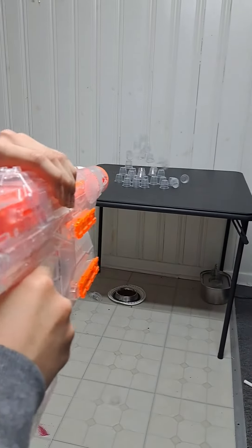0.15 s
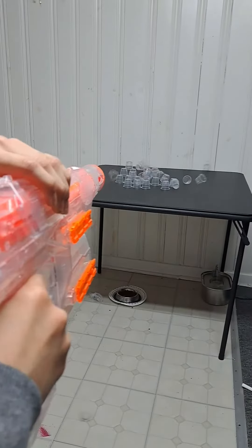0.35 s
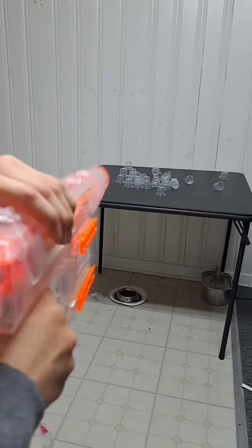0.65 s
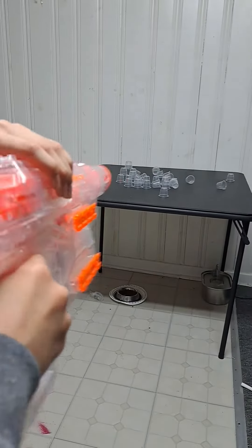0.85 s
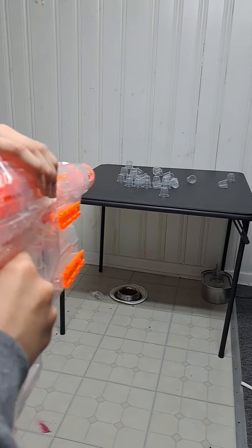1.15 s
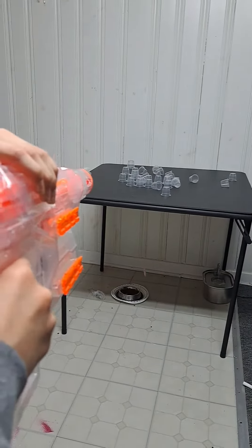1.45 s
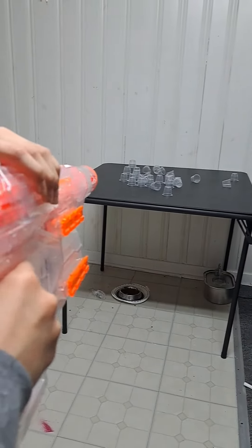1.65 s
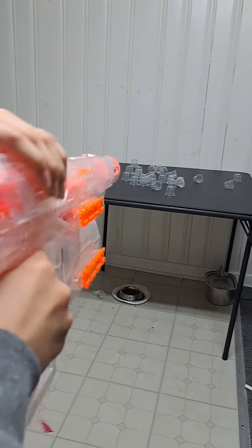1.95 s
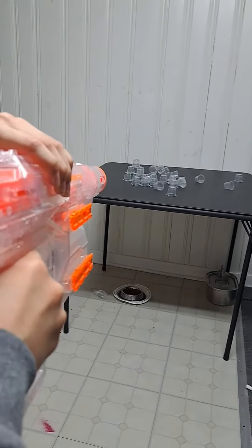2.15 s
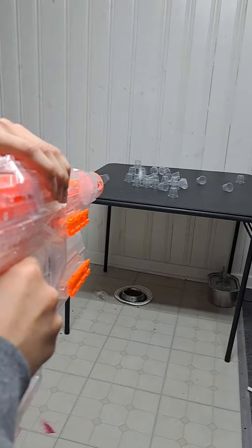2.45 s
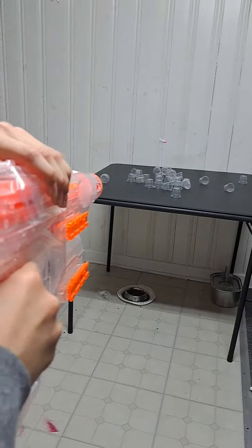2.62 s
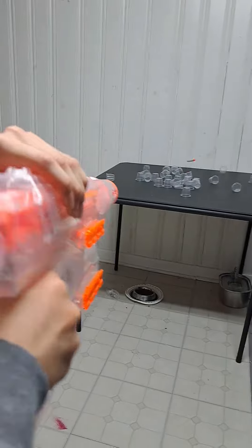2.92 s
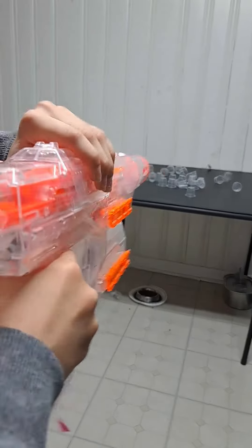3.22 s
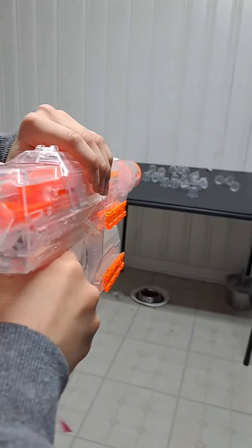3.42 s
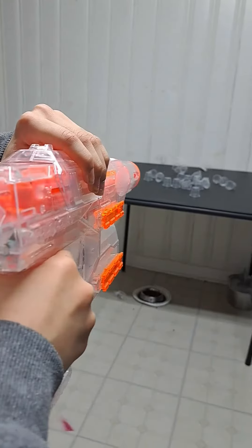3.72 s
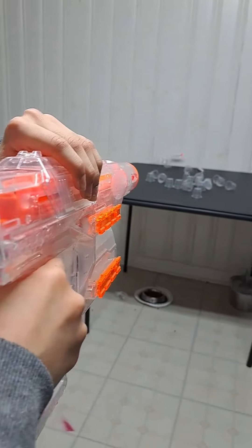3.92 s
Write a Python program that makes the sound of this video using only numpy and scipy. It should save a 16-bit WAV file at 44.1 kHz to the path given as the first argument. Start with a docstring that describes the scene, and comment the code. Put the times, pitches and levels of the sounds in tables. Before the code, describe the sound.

Close plastic cracks and ratcheting slide clacks from a spring dart blaster, with small cups popping and clattering farther off in a small room.

```python
"""A trigger creaks and a spring dart blaster cracks, close to the microphone in a small bare room.
It fires four times; between shots the slide ratchets back and clacks shut. Farther off, foam darts
slap a stack of small plastic cups and the wall behind. The cups pop hollowly on a folding table,
click on the floor and rock on their rims. The room answers every blow, heard in stereo."""
import sys
import numpy as np
from scipy import signal
from scipy.fft import rfft, irfft, next_fast_len
from scipy.io import wavfile
from scipy.ndimage import uniform_filter1d

SR = 44100
rng = np.random.default_rng(int(sys.argv[2]) if len(sys.argv) > 2 else 0)


def transcribe(u):
    """Save the signal u as a 16-bit wav file named by the first command-line argument.

    u: samples, shape (n,) or (channels, n), limited to [-1, 1]; the rate is SR.
    q: integer samples, one column per channel.
    """
    v = np.clip(np.atleast_2d(u).T, -1, 1)
    q = np.round(v * 32767).astype(np.int16)
    wavfile.write(sys.argv[1], SR, q)


N = 179751
T = np.arange(SR // 5) / SR  # seconds within one blow

# The blaster fires. Each row: catch release in seconds, trigger lead in seconds, crack in dB,
# thud in dB, t60 of the spring's shudder in seconds.
SHOTS = [(0.0914, 0.052, -0.5, -3, 0.25), (1.2891, 0.054, 0.5, -1, 0.26), (2.451, 0.06, 1, 0, 0.2),
         (3.634, 0.067, 0.5, 0.5, 0.29)]
# Within a shot the trigger bottoms out, the catch lets go, the plunger lands and rebounds.
# Each row: delay in seconds, crack in dB, thud in dB, thud centre in Hz, crack t60 in seconds.
FIRING_CONTACTS = [(-0.0068, -24.5, -20.5, 176, 0.029), (0, -13, -21, 500, 0.043),
                   (0.0273, -14.5, -11.5, 530, 0.029), (0.0563, -30, -29, 540, 0.027)]
# Modes of the blaster's shell, the air in its barrel, and the table or wall panel.
# Each row: pitch in Hz, relative level in dB, t60 in seconds.
SHELL_MODES = [(134, -19.5, 0.032), (185, -13.5, 0.042), (387.7, -3.5, 0.061), (443.5, 0, 0.054),
               (502.5, 3.5, 0.038), (573.8, -6, 0.071), (604.8, 1.5, 0.041), (710, -4, 0.065),
               (1093, -26, 0.016), (1480, -18, 0.023), (1937, -6, 0.02), (2560, -2, 0.014)]
BARREL_MODES = [(461, -2, 0.23), (509.5, -2, 0.22)]
PANEL_MODES = [(147, -22, 0.026), (198.7, -11, 0.12), (309, -2, 0.069), (327.4, -10, 0.069),
               (369, 1, 0.065), (409, -7, 0.084), (556, 8.5, 0.025), (719, 1, 0.041)]
# A dart strikes cups, table or wall. Each row: start in seconds, slap in dB, panel boom in dB.
DART_HITS = [(0.1931, -18, -38), (0.4547, -48, -29.5), (1.4273, -18.5, -18.5), (1.4906, -30.5, -37),
             (2.5351, -15, -28.5), (2.5625, -23, -57), (3.7401, -19, -29), (3.7654, -29.5, -46.5)]
# A cup lands mouth down. Each row: start in seconds, level in dB, cavity pitch in Hz, table thump in dB.
CUP_LANDINGS = [(0.245, -11.5, 1523, -59), (0.391, -26, 1574, -29.5), (0.74, -23.5, 1508, -61),
                (0.774, -33, 1520, -47), (0.8519, -25.5, 1353, -52), (1.194, -42, 1420, -64),
                (2.626, -11, 1531, -28.5), (2.89, -29.5, 1523, -40), (3.149, -22.5, 1540, -49),
                (3.2646, -20.5, 1535, -46), (3.324, -20, 1472, -69), (3.486, -29, 1504, -59),
                (3.604, -23.5, 1550, -66), (3.872, -20.5, 1530, -30), (4.027, -32.5, 1610, -51)]
# Modes of a cup. Each row: multiple of the cavity pitch, relative level in dB, t60 in seconds.
CUP_MODES = [(0.82, -1, 0.017), (1, 6, 0.036), (1.119, 0, 0.018), (1.3, -12, 0.011)]
# Rims strike each other or the floor. Each row: start in seconds, click in dB, thump in dB.
RIM_HITS = [(0.282, -15.5, -36), (0.386, -22.5, -38.5), (0.473, -29.5, -62), (0.523, -32.5, -38),
            (0.765, -27.5, -66), (0.775, -24.5, -60), (1.041, -39.0, -44.5), (1.091, -33, -74),
            (1.611, -38.5, -44), (3.151, -27.5, -42), (3.841, -22.5, -33), (4.005, -27.5, -30.5)]
# Toppled cups nudge each other. Each row: start and end in seconds, highest tick level in dB.
SETTLING_SPANS = [(0.295, 1.095, -41.5), (1.518, 1.75, -46), (2.656, 4.05, -47.5)]
# The slide goes back. Each row: arrival at the stop in seconds, ratchet run in seconds, level in dB.
SLIDE_PULLS = [(0.6986, 0.075, 1), (1.8765, 0.0795, -0.5), (3.0393, 0.075, 0)]
# Where the ratchet catches. Each entry: share of the run still to go.
RATCHET_TEETH = [1, 0.655, 0.46, 0.325, 0.11]
# The slide is pushed shut. Each row: landing in seconds, level in dB.
SLIDE_SHUTS = [(0.8957, -0.5), (2.0791, 1), (3.2411, 0.5)]
# In closing, a dart is fed, the slide brushes the latch and lands, and the latch snaps in.
# Each row: delay in seconds, crack in dB, thud in dB, thud centre in Hz, crack t60 in seconds.
CLOSING_CONTACTS = [(-0.102, -32.5, -34.5, 427, 0.042), (-0.015, -31.5, -41, 547, 0.04),
                    (0, -13.5, -21.5, 620, 0.022), (0.0036, -14.5, -22, 705, 0.03)]
# A fallen cup rocks. Each row: start and end in seconds, first and last pitch in Hz,
# first and last level in dB.
ROCKING_SPANS = [(0.867, 1.235, 1465, 1452, -41.5, -47.5), (1.472, 1.662, 1313, 1077, -46, -46),
                 (1.902, 2.41, 1560, 1145, -47.5, -47)]
# Noise colours of the blaster's crack, a dart's slap, a cup's thin wall, its rim, and the room's air.
# Each row: frequency in Hz, relative spectral density in dB.
CRACK_SPECTRUM = [(30, -1), (110, -26.5), (400, 2), (950, 3.5), (1400, 6.5), (2000, 9.5), (3200, 0.5),
                  (5000, 2.5), (7400, -1), (9000, -6.5), (12000, -2.5), (16000, -11)]
SLAP_SPECTRUM = [(80, -44.5), (400, 3), (850, 3.5), (1500, 9), (2200, 0.5), (3200, -10.5), (7000, -9),
                 (16000, -11.5)]
CUP_WALL_SPECTRUM = [(150, -20), (800, -13), (1300, 0), (2050, -3.5), (3000, -25.5), (12000, -22),
                     (16000, -32)]
RIM_SPECTRUM = [(100, -21), (900, 0), (1600, 8), (2500, -1), (3600, 6), (4900, -3.5), (6400, 0),
                (8500, -7.5), (12000, -3.5), (16000, -10.5)]
AIR_SPECTRUM = [(30, -14), (70, -20), (700, -6.5), (2000, -19.5), (16000, -60)]
# How alike the microphone's two ports sound. Each row: frequency in Hz, left-right correlation.
PORT_LIKENESS = [(150, 0.84), (350, 1), (650, 0.43), (1500, -0.099), (3500, -0.29), (9000, 0.21)]
# How the ports differ in colour. Each row: frequency in Hz, left over right in dB.
PORT_BALANCE = [(150, .5), (350, -1.5), (700, -4.5), (1800, -3), (4000, -1), (8000, -2), (14000, 3)]


def amp(db):
    """Decibels to gain."""
    return 10 ** (np.asarray(db) / 20)


def along(points, hz):
    """Read a curve of (Hz, value) points on a log frequency axis."""
    freqs, values = np.transpose(points)
    return np.interp(np.log(hz + 1), np.log(freqs), values)


def filtered(x, response):
    """x through a response given as a function of frequency."""
    n = x.shape[-1]
    padded = next_fast_len(n + SR // 20)
    return irfft(rfft(x, padded) * response(np.fft.rfftfreq(padded, 1 / SR)), padded)[..., :n]


def coloured(x, spectrum, size=1024):
    """x through the causal filter that has this spectrum."""
    gain = amp(along(spectrum, np.fft.rfftfreq(size, 1 / SR)))
    cepstrum = irfft(np.log(gain))
    cepstrum[1:size // 2] *= 2  # fold to minimum phase
    cepstrum[size // 2 + 1:] = 0
    impulse = irfft(np.exp(rfft(cepstrum)))
    return signal.fftconvolve(x, impulse[None], axes=1)[:, :x.shape[1]]


def stereo_noise(n):
    """White noise at the microphone's two ports: alike in the bass, barely related in the treble."""
    def mid_side_gains(hz):
        angle = np.arccos(np.clip(along(PORT_LIKENESS, hz), -1, 1)) / 2
        return np.array([np.cos(angle), np.sin(angle)])
    mid, side = filtered(rng.standard_normal((2, n)), mid_side_gains)
    return np.array([mid + side, mid - side])


def unit_crest(x, size=180):
    """Scale a sound so that its loudest few milliseconds have rms 1."""
    power = np.mean(np.atleast_2d(x) ** 2, axis=0)
    return x / np.sqrt(uniform_filter1d(power, size, mode="constant").max() + 1e-20)


def burst(spectrum, t60, attack=0.00054):
    """The crack of a contact: coloured noise that dies quickly."""
    envelope = amp(-60 * T / max(t60, .002)) * (1 - np.exp(-T / attack))
    return unit_crest(coloured(stereo_noise(len(T)) * envelope, spectrum))


def ring(modes, attack, scatter_db, port_lag=.00006):
    """Damped modes at random strengths; each reaches one microphone port a little before the other."""
    hz, db, t60 = np.transpose(modes)[:, :, None]
    strength, phase, side = rng.uniform(-1, 1, (3, len(hz), 1))
    decay = amp(db + scatter_db * strength - 60 * T / t60) * (1 - np.exp(-T / attack))
    lag = port_lag * np.sign(side)
    ports = [(decay * np.sin(2 * np.pi * hz * (T + shift) + phase)).sum(0) for shift in (-lag, lag)]
    return unit_crest(np.array(ports))


def struck_at(modes, centre_hz, favour_db, reach=0.25):
    """Where a blow lands decides which modes answer: those near the centre pitch are favoured."""
    return [(hz, db + favour_db * np.exp(-(np.log(hz / centre_hz) / reach) ** 2), t60)
            for hz, db, t60 in modes]


def room(x, wet_db, low_t60=0.34, high_t60=0.25, split_hz=900, build_s=0.0056):
    """Direct sound plus the bare room's diffuse tail, new for each place, whose bass lasts longest."""
    t = np.arange(SR // 2) / SR
    noise = stereo_noise(len(t))
    low = signal.sosfilt(signal.butter(1, split_hz, fs=SR, output="sos"), noise)
    response = low * amp(-60 * t / low_t60) + (noise - low) * amp(-60 * t / high_t60)
    response *= 1 - np.exp(-(t / build_s) ** 2)
    response *= amp(wet_db) / np.linalg.norm(response[0])
    response[:, 0] += 1  # the straight path to the microphone
    return signal.fftconvolve(x, response, axes=1)


def add(out, s, x):
    """Mix x in at s seconds."""
    part = out[:, max(round(s * SR), 0):][:, :x.shape[1]]
    part += x[:, :part.shape[1]]


def rattle(swell_s, rattle_db, shell_db, fade_t60, rise_db, grain_db, grain_samples=45):
    """Tiny uneven knocks shake the blaster's shell, close up, and fade after swell_s."""
    late = T - swell_s
    swell = amp(np.where(late < 0, rise_db * late / swell_s, -60 * late / fade_t60))
    swell *= 1 - np.exp(-T / .006)  # eases in
    knocks = amp(np.minimum(rng.standard_normal(len(T) // grain_samples + 1), 1) * grain_db)
    drive = stereo_noise(len(T)) * swell * np.repeat(knocks, grain_samples)[:len(T)]
    shell = ring(SHELL_MODES, attack=0.002, scatter_db=5.0)
    body = unit_crest(signal.fftconvolve(drive, shell, axes=1)[:, :len(T)])
    grit = unit_crest(coloured(drive, CRACK_SPECTRUM))
    return room(amp(rattle_db) * grit + amp(shell_db) * body, wet_db=-11)


def contact(crack_db, thud_db, centre_hz, t60, attack, wet_db, favour_db=10, tilt_db=2, usual_t60=0.029):
    """Two parts of the blaster meet: a crack, and the hollow ring of the shell."""
    thud = amp(thud_db) * ring(struck_at(SHELL_MODES, centre_hz, favour_db), attack=0.0036, scatter_db=2)
    slope_db = tilt_db * np.log2(usual_t60 / t60)  # per octave: a shorter contact is brighter
    spectrum = [(hz, db + slope_db * max(np.log2(hz / centre_hz), 0)) for hz, db in CRACK_SPECTRUM]
    crack = amp(crack_db) * burst(spectrum, t60, attack)
    return room(crack, wet_db) + room(thud, wet_db=-13)


def blaster_shots(spring_lag_s=0.0045, spring_swell_s=0.022):
    """At the microphone the trigger creaks, the plunger flies, the spring shudders, the barrel hoots."""
    out = np.zeros((2, N))
    for s, lead_s, crack_db, thud_db, shudder_t60 in SHOTS:
        creak = rattle(0.0087, rattle_db=-43, shell_db=-47, fade_t60=0.13, rise_db=-5, grain_db=8.5)
        add(out, s - lead_s, creak)
        for delay, crack, thud, hz, t60 in FIRING_CONTACTS:
            knock = contact(crack + crack_db, thud + thud_db, hz, t60, attack=0.00066, wet_db=-5.5)
            add(out, s + delay, knock)
        shudder = rattle(spring_swell_s, rattle_db=crack_db - 17, shell_db=thud_db - 21.5,
                         fade_t60=shudder_t60, rise_db=8.5, grain_db=6)
        add(out, s + spring_lag_s, shudder)
        hoot = amp(thud_db - 21) * ring(BARREL_MODES, attack=0.0045, scatter_db=2.5)
        add(out, s + spring_lag_s + spring_swell_s, room(hoot, wet_db=-13.5))
    return out


def dart_hits():
    """Across the room a foam dart slaps and sets the low modes of the panel booming."""
    out = np.zeros((2, N))
    modes = struck_at(PANEL_MODES, centre_hz=271, favour_db=6, reach=0.54)
    for s, slap_db, panel_db in DART_HITS:
        slap = amp(slap_db) * burst(SLAP_SPECTRUM, t60=0.091, attack=0.00044)
        boom = amp(panel_db) * ring(modes, attack=0.0026, scatter_db=4.5)
        add(out, s, room(slap + boom, wet_db=-3))
    return out


def cup_note(hz):
    """The short hollow note of the air in a cup; its side modes shift with the way the cup lands."""
    modes = [(hz * ratio ** (1 + rng.normal(0, 0.41)), db, t60) for ratio, db, t60 in CUP_MODES]
    return ring(modes, attack=0.0009, scatter_db=7.5, port_lag=.00004)


def cup_pops(echo_s=0.0083, echo_db=-5, slap_db=-11, rim_db=-20, flop_s=0.00421, flop_db=-3):
    """Cups land on edge and flop flat on the table, which thumps; the wall behind repeats the note."""
    out = np.zeros((2, N))
    for s, db, hz, thump_db in CUP_LANDINGS:
        pop = cup_note(hz) + amp(slap_db) * burst(CUP_WALL_SPECTRUM, t60=0.12)
        pop += amp(rim_db) * burst(RIM_SPECTRUM, t60=0.025)
        add(pop, flop_s, amp(flop_db) * cup_note(hz))
        add(out, s, room(amp(db) * pop, wet_db=-1.5))
        add(out, s + echo_s, amp(db + echo_db) * pop[::-1])  # left and right swap in the echo
        thump = amp(thump_db) * ring(PANEL_MODES, attack=0.0033, scatter_db=7.5)
        add(out, s, room(thump, wet_db=1.5))
    return out


def rim_clicks():
    """Thin rims click far from the microphone, so the room is nearly as loud as the click."""
    out = np.zeros((2, N))
    for s, click_db, thump_db in RIM_HITS:
        click = amp(click_db) * burst(RIM_SPECTRUM, t60=0.024, attack=0.0014)
        thump = amp(thump_db) * ring(PANEL_MODES, attack=0.0013, scatter_db=5.5)
        add(out, s, room(click + thump, wet_db=-1))
    return out


def settling_cups(ticks_per_s=16, scatter_db=4):
    """Faint, distant rim ticks scatter while toppled cups come to rest."""
    out = np.zeros((2, N))
    for start, end, db in SETTLING_SPANS:
        for s in np.arange(start, end, 1 / ticks_per_s):
            delay, softness = rng.random(2)
            tick = burst(RIM_SPECTRUM, t60=0.032, attack=0.0015)
            add(out, s + delay / ticks_per_s, amp(db - scatter_db * softness) * tick)
    return room(out, wet_db=-0.5)[:, :N]


def slide_pulls(slack_s=0.017):
    """Close up, the slide scrapes through its slack, runs back over the ratchet and strikes its stop."""
    out = np.zeros((2, N))
    for stop, run_s, db in SLIDE_PULLS:
        scrape_s = run_s + slack_s
        scrape = rattle(scrape_s, rattle_db=db - 27, shell_db=db - 25.5,
                        fade_t60=0.092, rise_db=1.5, grain_db=6)
        add(out, stop - scrape_s, scrape)
        for to_go in RATCHET_TEETH:
            tooth_hz = 470 * np.exp(rng.normal(0, 0.091))  # every tooth shakes the shell differently
            tooth = contact(db - 23, db - 29, tooth_hz, t60=0.013, attack=0.0026, wet_db=-16)
            add(out, stop - to_go * run_s, tooth)
        knock = contact(db - 12.5, db - 21.5, 430, t60=0.023, attack=0.0004, wet_db=-8, favour_db=2.5)
        add(out, stop, knock)
    return out


def slide_shuts():
    """Close up, the slide runs forward, feeds a dart and clacks shut."""
    out = np.zeros((2, N))
    for s, db in SLIDE_SHUTS:
        for delay, crack, thud, hz, t60 in CLOSING_CONTACTS:
            add(out, s + delay, contact(crack + db, thud + db, hz, t60, attack=0.00065, wet_db=-10.5))
    return out


def rocking_cups(taps_per_s=55, turn_s=0.0695, sway_db=5, scatter_db=2):
    """Far off, a rim taps and swells once a turn; the note sinks as the gap under the cup closes."""
    out = np.zeros((2, N))
    for start, end, start_hz, end_hz, start_db, end_db in ROCKING_SPANS:
        for s in np.arange(start, end, 1 / taps_per_s):
            hz = np.interp(s, (start, end), (start_hz, end_hz))
            db = np.interp(s, (start, end), (start_db, end_db))
            lean_db = -sway_db * np.cos(2 * np.pi * (end - s) / turn_s)  # it leans harder on one side
            tap = cup_note(hz) + amp(-13) * burst(CUP_WALL_SPECTRUM, t60=0.02)
            add(out, s + rng.normal(0, 0.003), amp(db + lean_db + scatter_db * rng.normal()) * tap)
    return room(out, wet_db=3.5)[:, :N]


def scene():
    """The blaster close by, darts and cups farther off, over the faint air of the room."""
    air = coloured(stereo_noise(N), AIR_SPECTRUM)
    blaster = blaster_shots() + slide_pulls() + slide_shuts()
    cups = cup_pops() + rim_clicks() + settling_cups() + rocking_cups()
    return amp(-66.5) * air / air.std() + blaster + dart_hits() + cups


def record(dry, low_cut_hz=65, top_hz=15900):
    """The microphone's ports differ in colour and lose deep bass; the recorder trims peaks and top."""
    def microphone(hz):
        balance = amp(np.outer([1, -1], along(PORT_BALANCE, hz)) / 2)
        return balance * 1j * hz / (1j * hz + low_cut_hz)
    picked_up = filtered(dry, microphone)
    rounded = picked_up / (1 + picked_up ** 6) ** (1 / 6)  # soft clipping
    return filtered(rounded, lambda hz: 1 / np.sqrt(1 + (hz / top_hz) ** 120))


dry = scene()
out = record(dry)
transcribe(out)
```